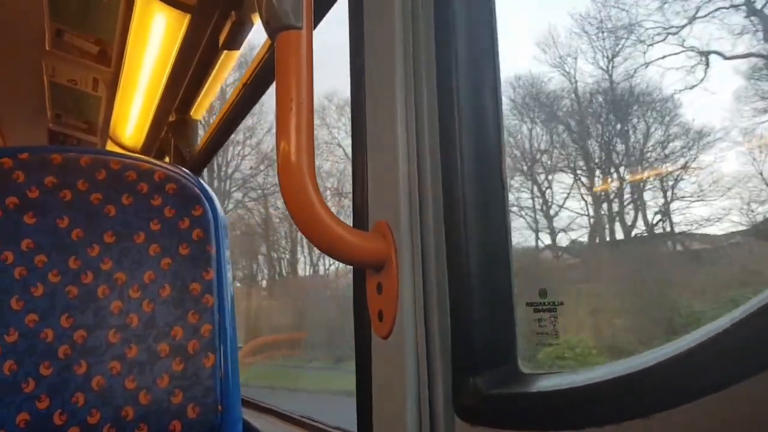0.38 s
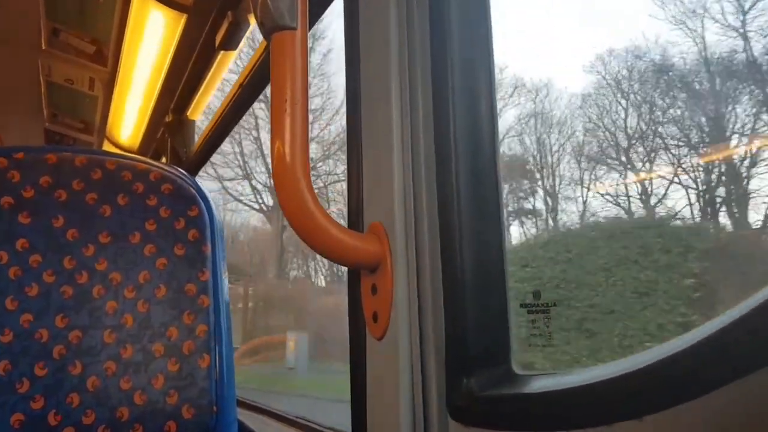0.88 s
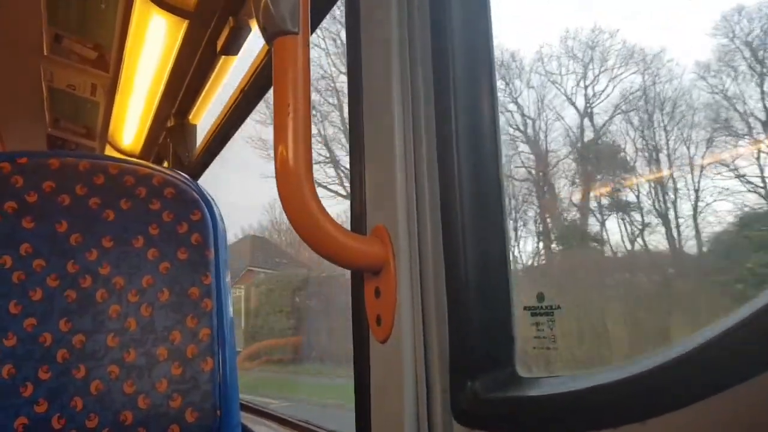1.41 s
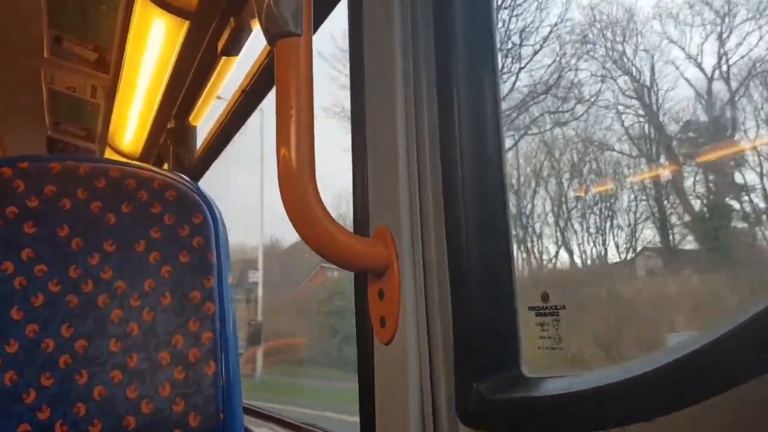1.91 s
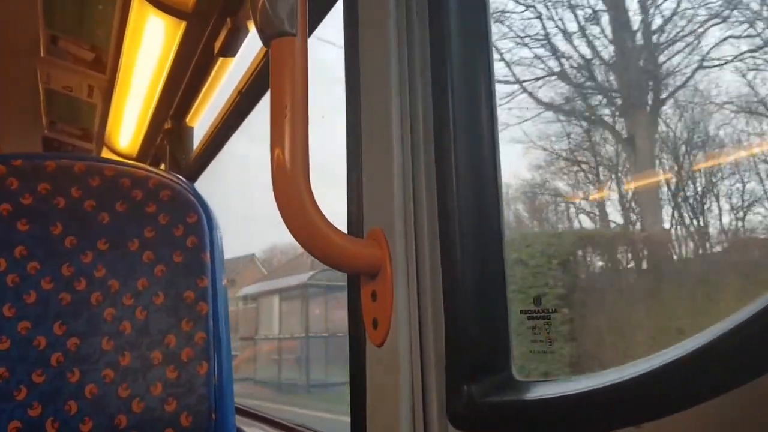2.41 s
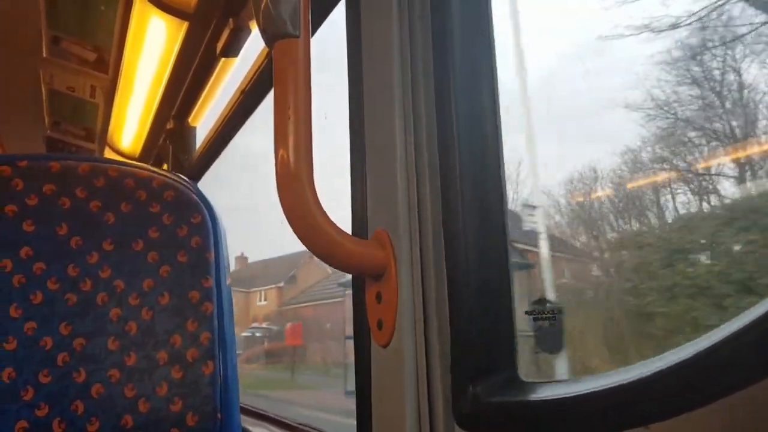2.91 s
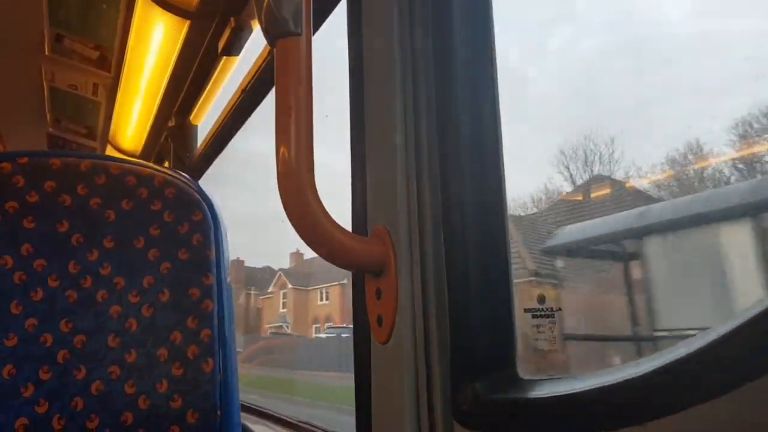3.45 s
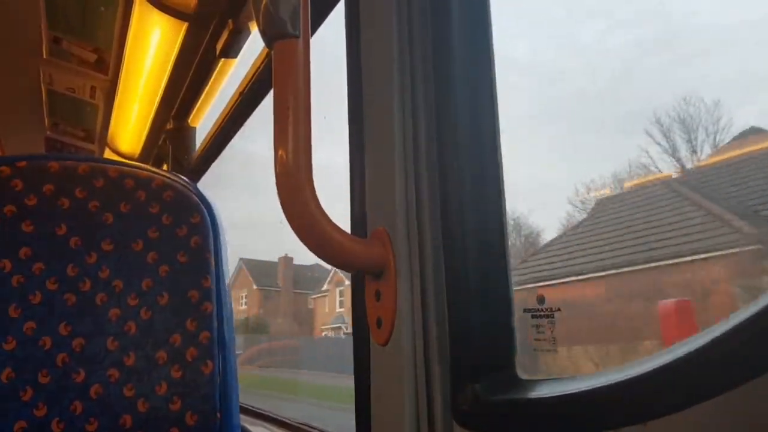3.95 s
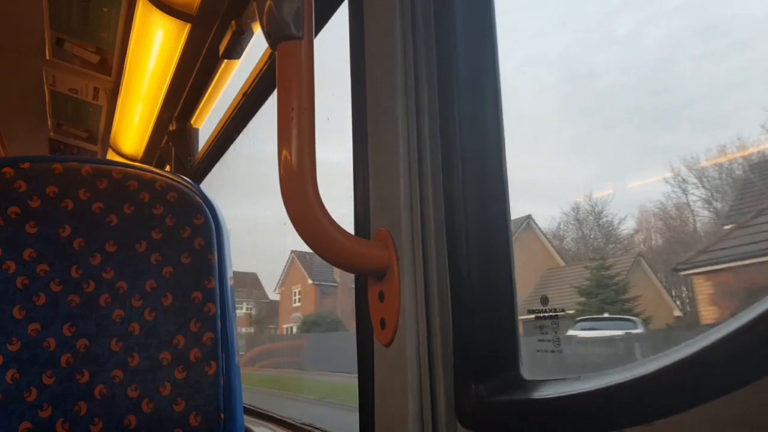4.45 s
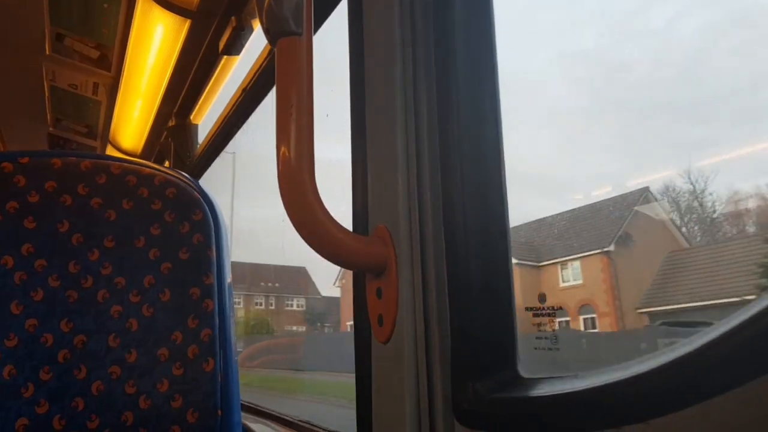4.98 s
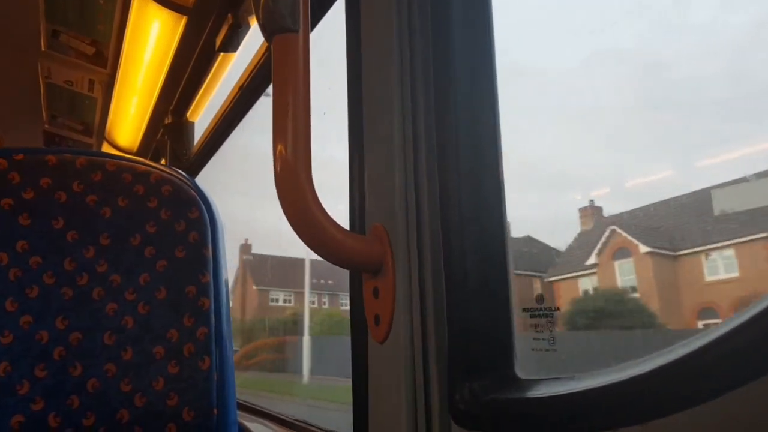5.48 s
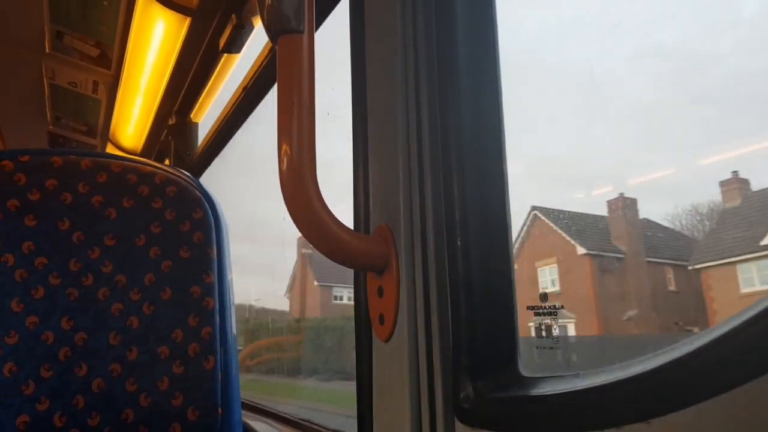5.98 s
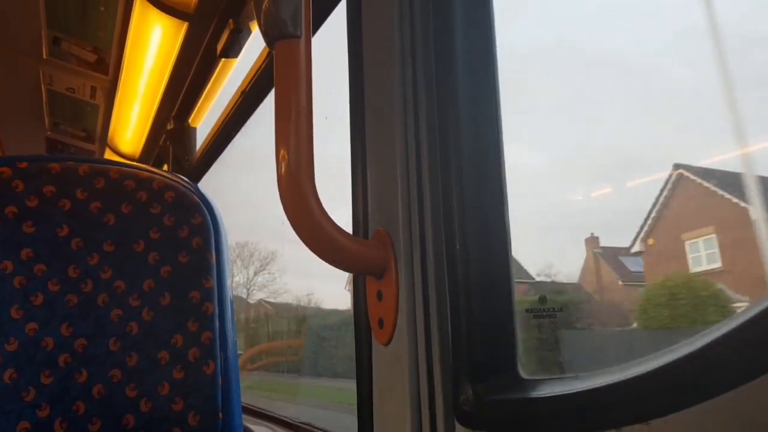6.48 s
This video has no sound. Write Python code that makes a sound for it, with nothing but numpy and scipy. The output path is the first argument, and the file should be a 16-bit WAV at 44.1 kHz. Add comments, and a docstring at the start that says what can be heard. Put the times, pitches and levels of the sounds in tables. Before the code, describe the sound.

Inside a moving diesel bus, a deep throbbing engine boom revs up, sinks through a gear change, then slowly pulls upward again over road rumble.

```python
"""A diesel's engine tone booms and throbs inside the saloon of a moving bus: it revs up, drops through a gear
change and pulls again. The engine has six cylinders and a leaking exhaust, drawn as sines on multiples of its
cycle. Filtered noise makes the road rumble, body drone, cover rattle and diesel clatter; wavering sines make
the faint turbocharger whistle, driveline whines and hissy swells of the cover; scuffed resonators make loose
trim tick."""
import sys
import numpy as np
from scipy import signal
from scipy.fft import rfft, irfft, next_fast_len
from scipy.io import wavfile

SR = 44100
rng = np.random.default_rng(int(sys.argv[2]) if len(sys.argv) > 2 else 0)


def wrap_up_sound(samples):
    """Save the sound to the file named by the first command line argument, as 16-bit audio."""
    columns = np.atleast_2d(samples).T
    # keep every value between -1 and 1, then stretch to whole-number steps
    tamed = np.clip(columns, -1, 1)
    steps = np.round(tamed * 32767).astype(np.int16)
    wavfile.write(sys.argv[1], SR, steps)


def attenuation_scalar(level_db):
    """Turn a level in dB into a linear amplitude multiplier (20 dB per decade)."""
    decades = np.asarray(level_db, float) / 20
    return 10 ** decades


N = 291942


def in_time(rows):
    """The columns of a table over time, one value a sample."""
    t, *columns = np.transpose(rows)
    return [np.interp(np.arange(N) / SR, t, column) for column in columns]


def at_hz(rows, hz):
    """The columns of a table over frequency, read on a log axis."""
    points, *columns = np.transpose(rows)
    return [np.interp(np.log(hz), np.log(points), column) for column in columns]


def drift(rate_hz):
    """Random wander of rms 1: noise through two one-pole low-passes at rate_hz."""
    step = 40  # samples between drawn points
    settle = 2000  # points dropped while the filter starts up
    pole = np.exp(-2 * np.pi * rate_hz * step / SR)
    white = rng.standard_normal(N // step + settle + 2)
    slow = signal.lfilter([1], [1, -2 * pole, pole ** 2], white)[settle:]
    slow = slow / np.sqrt(np.mean(slow ** 2) + 1e-20)
    return np.interp(np.arange(N) / step, np.arange(len(slow)), slow)


# How the saloon's standing waves bring a tone to the two microphones:
# (f/Hz, left-right level/dB, left lead/rad)
SALOON_STEREO = [(76, .5, 0), (84, .5, .3), (92, .7, .6), (98, -1.8, .62), (102, -4.5, .7), (106, -2.5, 0),
                 (118, -4, .45), (145, -1.8, .3), (155, -2.5, .3), (180, -.3, .1), (190, -1.5, 0),
                 (200, 1, -.2), (250, 1.5, -.5), (350, 1.5, -.2), (700, 3, -1.5)]


def tone(hz, level_db):
    """A sine that follows hz at an rms of level_db, placed left and right by the standing waves."""
    pan_db, lead = at_hz(SALOON_STEREO, hz)
    phase = 2 * np.pi * (np.cumsum(hz) / SR + rng.random())
    side = np.array([[.5], [-.5]])
    return np.sqrt(2) * attenuation_scalar(level_db + side * pan_db) * np.sin(phase + side * lead)


# The noises at the two microphones: (f/Hz, likeness/0-1, left-right level/dB)
NOISE_STEREO = [(30, .95, 3.5), (125, 0.91, 0), (254, 0.59, -1), (510, 0.25, 4.5), (1000, 0.19, 3),
                (2300, 0.33, 7), (4300, 0, 2.5), (8000, 0, 4), (13000, 0.07, 10)]


def noise(spectrum, patchy_db, peaks=()):
    """Stereo noise, its shared part later on the left; octaves flicker partly together; mid rms 1."""
    left_lag_s, lag_from_hz = 0.00043, 400  # the lag fades out below this frequency
    lowest_hz, highest_hz = spectrum[0][0], spectrum[-1][0]
    size = next_fast_len(N)
    hz = np.maximum(np.fft.rfftfreq(size, 1 / SR), 1)

    level_db, = at_hz(spectrum, hz)
    for peak_hz, width_hz, peak_db in peaks:
        level_db = level_db + peak_db / (1 + (2 * (hz - peak_hz) / width_hz) ** 2)

    alike, pan_db = at_hz(NOISE_STEREO, hz)
    lag = 2 * np.pi * left_lag_s * hz ** 3 / (hz ** 2 + lag_from_hz ** 2)
    shared, left, right = rfft(rng.standard_normal((3, size)))
    common = np.sqrt(alike) * shared * np.array([np.exp(-1j * lag), np.ones_like(hz)])
    pair = common + np.sqrt(1 - alike) * np.array([left, right])
    side = np.array([[.5], [-.5]])
    pair = pair * attenuation_scalar(level_db + side * pan_db) * (hz < highest_hz)

    out = 0
    together = drift(8.6)
    octave = np.maximum(np.log2(hz / lowest_hz), 0)
    for k in range(int(np.log2(highest_hz / lowest_hz)) + 2):
        overlap = np.clip(1 - abs(octave - k), 0, 1)
        band = irfft(pair * overlap, size)[:, :N]
        out = out + band * attenuation_scalar(patchy_db * (together + 0.54 * drift(9.3)))
    mid = np.mean(out, axis=0)
    return out / np.sqrt(np.mean(mid ** 2))


# Spectrum of the road under the floor: (f/Hz, relative level/dB per Hz)
ROAD_SPECTRUM = [(15, -31), (32, -14), (43, -17), (55, -8), (72, -6), (88, -6), (105, -11), (120, -17),
                 (150, -33)]


def road_rumble():
    """Low noise of the road, in a slow swell."""
    level_db = -25 + 4 * drift(1.0)
    return attenuation_scalar(level_db) * noise(ROAD_SPECTRUM, patchy_db=-1.9)


# Spectrum of the droning body: (f/Hz, relative level/dB per Hz)
DRONE_SPECTRUM = [(90, -20.5), (125, -2.5), (170, -3), (260, -1.5), (310, -7.5), (400, -13), (520, -15.5),
                  (680, -18.5), (900, -22.5), (1100, -40), (1400, -48)]
# Panel resonances that stand out of it: (f/Hz, width/Hz, level/dB)
PANELS = [(352, 8.3, 4), (471.5, 29, 8), (573.5, 49, 10.5), (836, 170, 6.5), (1007, 63, 15)]


def body_drone(load_db):
    """Noise ringing in the body panels, a little louder under load."""
    return attenuation_scalar(-26.5 + 1.1 * load_db) * noise(DRONE_SPECTRUM, patchy_db=1.3, peaks=PANELS)


# Ticks of the loose trim: (t/s, relative level/dB)
TICKS = [(0.081, -34), (1.6245, -35.5), (1.635, -40), (1.6486, -40.5), (2.5608, -36), (2.5938, -40.5),
         (2.7775, -43), (2.9663, -35)]
# Damped modes of the plastic: (f/Hz, relative level/dB, time to fall 60 dB/s)
TRIM_MODES = [(2130, -11.5, 0.0049), (2810, -6.5, 0.0097), (3700, -5.5, .003), (4610, -5.5, 0.0054),
              (5680, -10.5, .003), (6700, -12, 0.0024), (7740, -11.5, 0.0044), (9600, -6, 0.0021),
              (11200, -9.5, .002), (13000, -13.5, .002)]


def trim_ticks():
    """Each tick is a short scuff of noise into damped plastic modes, its strength new per mode and side."""
    t, tick_db = np.transpose(TICKS)
    chance_db = rng.normal(0, 2.5, (len(t), 2, len(TRIM_MODES)))
    fade = np.exp(-1 / (.001 * SR))  # the scuff peaks after 1 ms
    out = np.zeros((2, N))
    for k, (hz, mode_db, t60) in enumerate(TRIM_MODES):
        clicks = np.full((2, N), 1e-18)
        clicks[:, (t * SR).astype(int)] = attenuation_scalar(tick_db + mode_db - 11.5 + chance_db[:, :, k].T)
        # np.e offsets the loss of height in the two smoothing poles
        envelope = np.e * signal.lfilter([1 - fade], [1, -2 * fade, fade ** 2], clicks)
        scuff = envelope * rng.standard_normal(N)
        r = attenuation_scalar(-60 / (t60 * SR))
        w = 2 * np.pi * hz / SR
        out += signal.lfilter([0, np.sin(w)], [1, -2 * r * np.cos(w), r * r], scuff)
    return out * attenuation_scalar(np.array([[1.1], [-1.1]]))


# Spectrum of the rattling cover: (f/Hz, relative level/dB per Hz)
COVER_SPECTRUM = [(1400, -27), (1500, -7.5), (1900, -8), (2500, -11), (2800, -10.5), (3100, -34)]
# Its resonances: (f/Hz, width/Hz, level/dB)
COVER_MODES = [(1520, 23, 11), (1790, 35, 6), (1934, 43, 9), (2028, 18, 11.5), (2256, 45, 9.5),
               (2400, 17, 6), (2450, 27, 11.5), (2764, 46, 9)]


def cover_rattle(load_db):
    """Noise ringing in the cover's resonances, rising steeply with load."""
    return attenuation_scalar(-51 + 3.1 * load_db) * noise(COVER_SPECTRUM, patchy_db=1.5, peaks=COVER_MODES)


# Whines of pump and gears; the rows with a large waver are cover resonances swelling one by one into hissy
# bands: # (multiple of firing rate, loudest at t/s, time from there to -6 dB/s, level/dB, waver/Hz)
WHINES = [(4.9, 3.15, .3, -34, .3), (4.9, 4.3, .4, -35, .3), (16.75, 1.1, .33, -53, 2),
          (23.7, .75, .4, -54, 12), (26.5, 1.9, .4, -52, 50), (24.5, 2.95, .2, -54, 40),
          (24.16, 4.05, .4, -55, 4)]


def driveline(firing_hz):
    """The pump and the gears turn with the engine, and cover resonances swell in hissy bands that follow its
    speed; each whine or band swells and fades."""
    out = 0
    for multiple, loudest_s, length_s, level_db, waver_hz in WHINES:
        away = (np.arange(N) / SR - loudest_s) / length_s
        swell_db = -np.minimum(6 * away ** 4, 90)
        hz = multiple * firing_hz + waver_hz * drift(15)
        out = out + tone(hz, level_db + swell_db + 1.5 * drift(5.5))
    return out


# Turbocharger blade tone, rising, sagging through the gear change and rising again: (t/s, f/Hz)
TURBO_PITCH = [(0, 9600), (.2, 10700), (.45, 11900), (.65, 12600), (.88, 13000), (1.1, 13160), (1.4, 12850),
               (2.2, 11600), (2.85, 12200), (3.3, 12450), (4.3, 12750), (6.62, 12900)]


def turbo(load_db):
    """Blade tone smeared into a hissy line by quick changes of shaft speed; louder on the left."""
    hz, = in_time(TURBO_PITCH)
    phase = 2 * np.pi * np.cumsum(hz + 115 * drift(150)) / SR
    level_db = -66 + 2.2 * load_db + 1.6 * drift(15)
    pan_db = np.array([[3.0], [-3.0]])
    return attenuation_scalar(level_db + pan_db) * np.sin(phase + np.array([[0], [1.3]]))


# Spectrum of the combustion noise: (f/Hz, relative level/dB per Hz)
CLATTER_SPECTRUM = [(620, -28.5), (1050, 0), (1240, -3), (1450, -3), (1830, -9), (2070, -7), (2450, -9.5),
                    (3090, -10), (4720, -10.5), (5160, -15), (6100, -17), (8250, -24), (12600, -24),
                    (13300, -28), (15000, -36.5)]


def clatter(firing_hz, load_db):
    """Hiss and rattle of combustion, swelling a little at each firing and with load."""
    beat = np.cos(2 * np.pi * np.cumsum(firing_hz) / SR)
    return attenuation_scalar(-45 + .9 * load_db + 0.43 * beat) * noise(CLATTER_SPECTRUM, patchy_db=0.66)


# Three clean engine lines: the firing rate, one and a half times it, and twice it:
# (multiple of firing rate, level/dB before the boom)
CLEAN_LINES = [(1, 0), (1.5, -8), (2, 0)]
# How the saloon booms at the pitch of a clean line: (f/Hz, level/dB)
BOOM = [(75, -16), (78, -17), (80.8, -15), (82.3, -7.5), (84, -6), (87, -7.5), (89, -9.5), (91, -10.5),
        (93, -8), (94.5, -8.5), (96, -10.5), (99, -9), (102, -16.5), (103.7, -7.5), (105, -11.5),
        (115, -23), (128, -20.5), (135, -17), (145, -14.5), (152, -24.5), (160, -18), (166, -18.5),
        (180, -18), (186, -26), (197, -25), (204, -26.5), (212, -42)]


def clean_lines(firing_hz):
    """Three clean engine lines boom in the saloon; the lowest falls away while the new gear engages."""
    engage_s, engage_length_s, engage_db = 2.06, 0.092, -20
    dip_db = engage_db * np.exp(-((np.arange(N) / SR - engage_s) / engage_length_s) ** 2)
    out = 0
    for multiple, line_db in CLEAN_LINES:
        hz = multiple * firing_hz
        boom_db, = at_hz(BOOM, hz)
        level_db = line_db + boom_db + .5 * drift(8)
        if multiple == 1:
            level_db = level_db + dip_db
        out = out + tone(hz, level_db)
    return out


# Cycle multiples above the rest: (multiple of cycle rate, extra level/dB)
STRONG_MULTIPLES = [(2, 5), (10, 6.5), (11, 1.5), (13, 7.5), (14, 4), (18, 8.5), (19, 6), (20, 2.5),
                    (21, 7.5), (24, 7.5), (27, 4)]
# Level of a cycle multiple as the saloon's resonances pass it: (f/Hz, level/dB)
CYCLE_LEVEL = [(30, -53.5), (50, -42), (65, -40), (76, -30.5), (86, -22), (95, -31.5), (106, -33),
               (130, -42.5), (170, -38.5), (230, -46.5), (250, -40), (300, -49), (340, -44), (385, -54),
               (420, -46.5), (450, -43), (520, -51), (580, -46.5), (640, -54), (720, -56.5), (835, -56),
               (1000, -65), (1100, -73)]


def uneven_cylinders(firing_hz, load_db):
    """Unequal cylinders sound the engine cycle's multiples; the leak rasps harder with speed."""
    cylinders = 6  # firings per engine cycle
    rasp_from = 19  # lowest cycle multiple in the rasp
    rasp_db = 0.23 * (firing_hz - 93.6)  # dB per Hz about the mean firing rate
    extra_db = dict(STRONG_MULTIPLES)
    out = 0
    for k in range(2, 66):
        if k in (6, 9, 12):  # already sounded by the clean engine lines
            continue
        hz = k / cylinders * firing_hz
        passed_db, = at_hz(CYCLE_LEVEL, hz)
        level_db = passed_db + extra_db.get(k, 0) + 1.3 * load_db + 2.25 * drift(1.2)
        if k >= rasp_from:
            level_db = level_db + rasp_db
        out = out + tone(hz, level_db)
    return out


def exhaust(firing_hz, load_db):
    """The wavering cycle multiples beat against the clean engine lines and make the tone throb."""
    return clean_lines(firing_hz) + uneven_cylinders(firing_hz, load_db)


# Engine speed, up in the low gear, down through the change, up again: (t/s, firing rate f/Hz)
SPEED = [(0, 89.73), (0.3, 97.65), (0.55, 102.3), (0.8, 103.6), (1.0, 105.2), (1.22, 105.6), (1.35, 96.63),
         (1.55, 87.7), (1.75, 81.7), (1.9, 78.65), (2.05, 76.52), (2.2, 77.43), (3, 82.38), (3.6, 86.6),
         (4.2, 89.12), (4.9, 92.85), (5.75, 95.24), (6.62, 98)]
# Engine load about its mean: (t/s, level/dB)
LOAD = [(0, 0), (0.29, -1), (0.52, 1), (1.31, 1), (1.6, .5), (1.84, -.5), (2.4, -0.5), (2.68, 0.5),
        (2.91, 2), (3.3, -.5), (3.64, -1.5), (4, -1), (5.6, 0), (6.2, .5), (6.62, 0.5)]


def scene():
    """All sources as they reach the two microphones, the engine's parts driven by one speed and load."""
    firing_hz, = in_time(SPEED)
    load_db, = in_time(LOAD)
    background = road_rumble() + body_drone(load_db) + trim_ticks() + cover_rattle(load_db)
    machinery = driveline(firing_hz) + turbo(load_db) + clatter(firing_hz, load_db)
    return background + machinery + exhaust(firing_hz, load_db)


def band_limit(x):
    """A steep low-pass at the top of the band."""
    return signal.sosfilt(signal.butter(12, 15200, fs=SR, output="sos"), x)


def record(dry):
    """The loudest peaks are rounded just under full scale."""
    mix = dry / (1 + abs(dry) ** 8) ** (1 / 8)
    return band_limit(mix)


dry = scene()
out = record(dry)
wrap_up_sound(out)
```